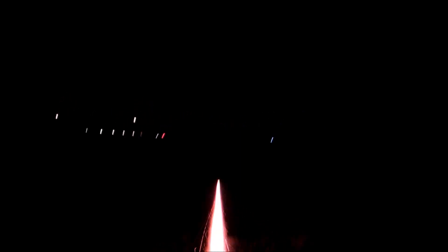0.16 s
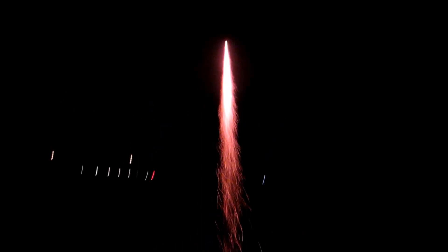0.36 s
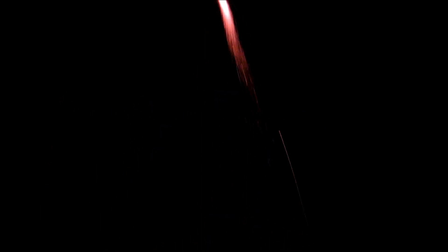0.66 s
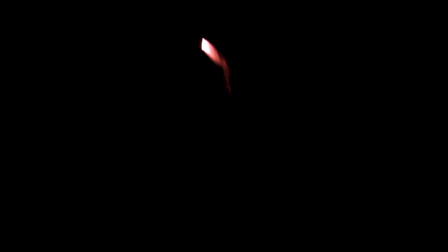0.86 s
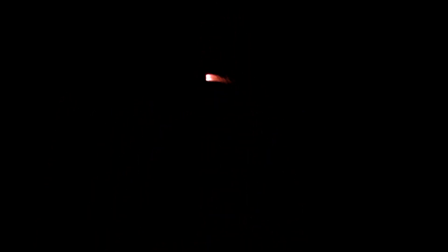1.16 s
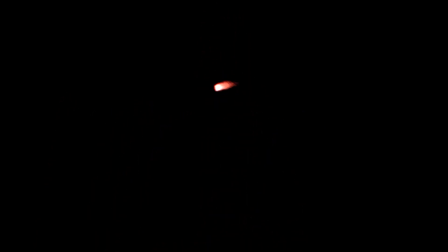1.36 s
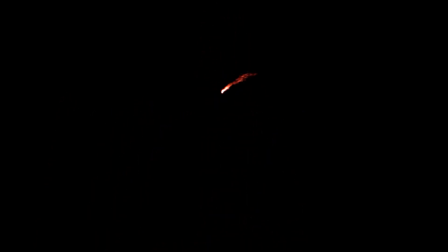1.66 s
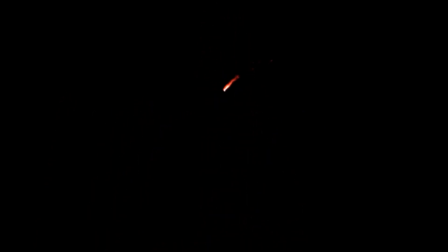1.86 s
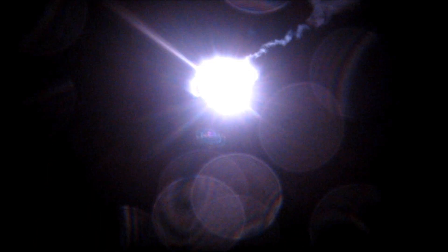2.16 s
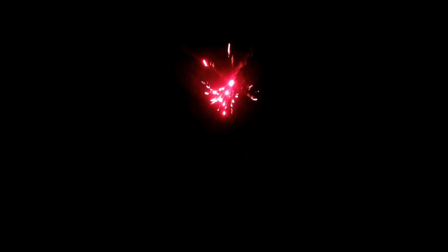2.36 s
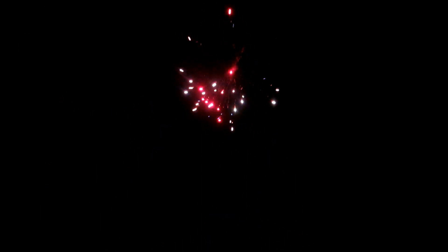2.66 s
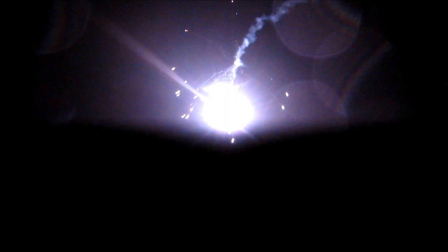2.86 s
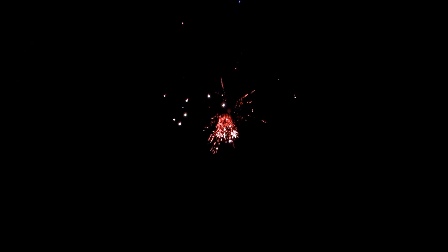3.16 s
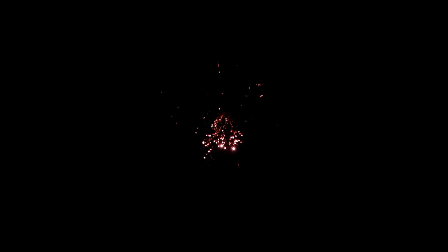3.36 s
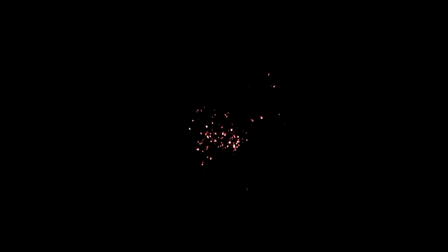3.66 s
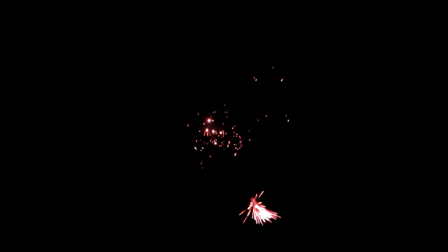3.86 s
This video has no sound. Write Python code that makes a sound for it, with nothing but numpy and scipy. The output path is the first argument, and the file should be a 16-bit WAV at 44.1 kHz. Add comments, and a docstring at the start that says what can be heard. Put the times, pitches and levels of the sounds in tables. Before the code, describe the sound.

Outdoors at night, a firework rocket takes off close by, hissing hard and dying away with height. After low wind thumps on the microphone, it bursts in two sharp cracks that overload the microphone and echo around the area.

```python
"""Firework rocket at night

A rocket leaves the ground with a hiss of turbulent exhaust that fades as it climbs and flares once more.
A gust buffets the microphone. Two bangs overhead, each a shock wave with a ground echo, overload the
recorder, which mutes for a moment and then lets the rolling echoes of the neighbourhood through."""
import sys
import numpy as np
from scipy import signal
from scipy.fft import rfft, irfft
from scipy.io import wavfile
from scipy.ndimage import uniform_filter1d, minimum_filter1d

SR = 44100
rng = np.random.default_rng(int(sys.argv[2]) if len(sys.argv) > 2 else 0)


def file_out(sig):
    """Save sig as 16-bit WAV at sys.argv[1]."""
    # one column per channel
    cols = np.atleast_2d(sig).T
    # limit, then scale
    lim = np.clip(cols, -1, 1)
    pcm = np.round(lim * 32767).astype(np.int16)
    wavfile.write(sys.argv[1], SR, pcm)


N = 176400
HOP, SIZE = 128, 512  # step and length of a short-time frame [samples]

# Shock arrivals, each bang followed by its ground echo:
# (time [s], push length [ms], edge [ms], push level [dB], rebound level [dB])
SHOCKS = [(2.40501, .11, .015, 44, 46), (2.40516, .04, .012, 49, 20), (2.41588, .26, .05, 43, 32),
          (2.42505, .2, .025, 20, -20), (3.10495, .1, .02, 44, 44.5), (3.11516, .24, .05, 43, 29.5)]


def gain_of(db):
    """Amplitude ratio of a level in decibels."""
    return 10 ** (np.asarray(db) / 20)


def unit_rms(x):
    """Normalisation to unit mean power."""
    return x / np.sqrt(np.mean(x ** 2) + 1e-20)


def curve_at(points, hz):
    """Interpolation of (frequency [Hz], value) points on a logarithmic frequency axis."""
    f, value = np.transpose(points)
    return np.interp(np.log(hz + 1), np.log(f + 1), value)


def unit_band(colour_db, hz, low_hz, high_hz):
    """Band normalisation: shifts a spectrum so that the given band has 0 dB rms."""
    inside = (hz > low_hz) & (hz < high_hz)
    return colour_db - 10 * np.log10((gain_of(2 * colour_db) * inside).mean(0))


def grid():
    """Frequencies (column) and frame times (row) of the short-time spectra."""
    return np.fft.rfftfreq(SIZE, 1 / SR)[:, None], np.arange(N // HOP + 5) * HOP / SR


def shaped_noise(field_db, patch_db, flicker_db):
    """Spectral shaping: noise follows a time-frequency field, with random patches and broadband flicker."""
    real, imag, patches = rng.standard_normal((N // HOP + 5, SIZE // 2 + 1, 3)).T
    flicker = unit_rms(uniform_filter1d(patches.mean(0), size=3))
    patches = unit_rms(uniform_filter1d(uniform_filter1d(patches, size=6, axis=0), size=16, axis=1))
    white = real + 1j * imag
    white_rms = np.std(signal.istft(white, nperseg=SIZE, noverlap=SIZE - HOP)[1])
    spectra = white * gain_of(field_db + patch_db * patches + flicker_db * flicker)
    return signal.istft(spectra, nperseg=SIZE, noverlap=SIZE - HOP)[1][:N] / white_rms


def night():
    """Ambient noise floor: a distant broadband hum and a faint whine of narrowband noise."""
    # Spectrum of the hum: (frequency [Hz], level [dB])
    hum_colour = [(350, -33), (600, -4), (911, -1.5), (1160, -1.5), (2130, -10.5), (2470, -8.5),
                  (4120, -13), (5250, -17), (8070, -29), (15000, -38)]
    hum_db, whine_db, whine_hz, width_hz = -51, -76, 7881, 6
    hz, _ = grid()
    colour = unit_band(curve_at([(60, -16)] + hum_colour[1:], hz), hz, 600, 15000)
    hum = shaped_noise(colour + hum_db, patch_db=0.95, flicker_db=0.34)
    pole = np.exp(-np.pi * width_hz / SR)
    drift = signal.lfilter([1], [1, -pole], rng.standard_normal(N) + 1j * rng.standard_normal(N))
    whine = unit_rms((drift * np.exp(2j * np.pi * whine_hz * np.arange(N) / SR)).real)
    return hum + gain_of(whine_db) * whine


def wind():
    """Turbulent pressure on the microphone: a deep, lumpy rumble throughout and the flutter of one gust."""
    # Envelopes, the rumble in consecutive stretches: (time [s], level [dB])
    rumble_levels = [
        [(0.0, -43.5), (0.116, -40), (0.166, -52), (0.374, -39), (0.484, -57.5), (1.076, -40), (1.2, -35)],
        [(1.22, -32), (1.238, -41), (1.426, -32), (1.448, -25), (2.12, -36), (2.204, -40.5), (2.36, -42)],
        [(2.48, -55), (2.492, -53), (2.794, -46), (2.812, -57), (2.898, -44), (2.93, -49), (3.07, -48)],
        [(3.18, -49), (3.38, -59), (3.416, -49), (3.444, -67), (3.704, -38), (3.77, -49), (4.0, -41.5)],
    ]
    gust_levels = [(0.8, -54), (0.82, -43.5), (0.972, -78), (0.994, -49.5), (1.55, -23.5), (1.86, -36.5),
                   (1.938, -64), (1.964, -31.5), (2.05, -48), (2.164, -42), (2.206, -63), (2.264, -38.5),
                   (2.332, -67), (2.36, -45)]
    # Spectra: (frequency [Hz], level [dB])
    rumble_colour = [(15, -25.5), (30, -5), (75, -1.5), (120, -4.5), (200, -13.5), (300, -27), (600, -70)]
    gust_colour = [(60, -28), (130, 2), (220, 0.5), (380, -9), (600, -21.5), (1200, -48.5)]
    lump_db, lump_hz = 4, 30  # depth and bandwidth of the random swings in level
    layers = [(rumble_colour, np.concatenate(rumble_levels)),
              (gust_colour, [(0.0035, -90.5)] + gust_levels + [(2.45, -90)])]
    hz, t, out = np.fft.rfftfreq(N, 1 / SR), np.arange(N) / SR, np.zeros(N)
    for colour, levels in layers:
        carrier, modulator = rfft(rng.standard_normal((2, N)))
        air = irfft(carrier * gain_of(curve_at(colour + [(20000, -260)], hz)), N)
        swings = unit_rms(irfft(modulator * np.exp(-(hz / lump_hz) ** 2), N))
        envelope = gain_of(np.interp(t, *np.transpose(levels)))
        out += envelope * unit_rms(air * gain_of(lump_db * swings))
    return out


def buffets():
    """Pressure pulses of the strongest eddies: brief dull puffs, the stronger ones wider in bandwidth."""
    # Eddies striking the microphone: (time [s], relative level [dB])
    eddies = [(0.989, -48), (1.02, -50), (1.061, -41), (1.148, -31), (1.254, -31.5), (1.287, -48),
              (1.305, -31.5), (1.337, -28), (1.391, -47), (1.391, -19.5), (1.434, -23.5), (1.47, -21),
              (1.516, -27), (1.534, -25.5), (1.572, -26.5), (1.571, -35), (1.602, -22), (1.657, -29.5),
              (1.685, -25), (1.778, -27.5), (1.839, -27), (1.923, -38), (1.965, -27), (1.994, -39),
              (2.022, -43), (2.207, -52.5)]
    rise_ms, low_hz, trim_db, length = 4, 215, -2, 1500
    age = np.arange(length) * 1000 / SR / rise_ms
    envelope = (age * np.exp(1 - age)) ** 2
    out = np.zeros(N)
    for start, db in eddies:
        top_hz = max(601 * gain_of(0.2 * (db + 22.5)), 2 * low_hz)
        band = signal.butter(3, [low_hz, top_hz], "band", fs=SR, output="sos")
        puff = envelope * signal.sosfilt(band, rng.standard_normal(2 * length))[length:]
        puff /= np.sqrt(np.sum(puff ** 2) / np.sum(envelope ** 2))
        out[round(start * SR):][:length] += gain_of(db + trim_db) * puff
    return out


def jet():
    """Jet noise: the turbulent exhaust hisses, changing colour as the rocket climbs away."""
    # Envelope of the hiss in consecutive stretches: (time [s], level [dB])
    hiss_levels = [
        [(0.0, -16), (0.19, -14.5), (0.208, -11.5), (0.402, -10), (0.6, -15.5)],
        [(0.62, -15), (0.896, -19.5), (0.934, -24), (1.166, -23.5), (1.2, -26)],
        [(1.22, -28), (1.314, -42.5), (1.514, -56.5), (1.726, -38.5), (1.766, -40.5), (1.836, -58),
         (2.04, -67.5), (2.05, -72), (2.1, -73)],
    ]
    # Spectra at five stages of the flight: (frequency [Hz], level [dB])
    on_pad = [(880, -45), (1500, -15), (1620, -13), (1930, -14), (2670, -7.5), (2890, -10), (3250, -7),
              (4850, -1), (5340, -3), (5610, -0.5), (6690, -5), (11600, -5.5), (13800, -12.5),
              (15500, -21.5)]
    lift_off = [(76, -44), (130, -15), (477, -10), (607, -9), (670, -10.5), (1320, -7.5), (1430, -4),
                (1680, -7.5), (3320, -1), (10600, 0), (12700, -1.5), (15500, -17)]
    climbing = [(350, -54), (600, -21), (669, -21.5), (890, -15.5), (1140, -16.5), (1230, -13),
                (1490, -13.5), (1730, -9), (4430, 0), (6580, -9.5), (7430, -4), (10000, -1.5), (12800, -9),
                (15500, -21.5)]
    aloft = [(530, -41), (900, -11.5), (1180, -9), (1540, -5.5), (1710, -4.5), (1860, -4.5), (2630, -1.5),
             (3420, -2.5), (4130, 0), (6900, -10), (7860, -5.5), (10200, -3.5), (13300, -13.5),
             (15500, -27)]
    flare = [(650, -23), (1100, -3.5), (1140, -9), (1560, -5.5), (2470, -8), (2850, -11), (3950, -8.5),
             (6830, -14), (10100, -16.5), (15000, -38)]
    # Moments when the colour leaves one stage or reaches the next: (time [s])
    stage_times = [.15, .22, .42, .6, .8, 1.0, 1.25, 1.5]
    ceiling = 0.78  # soft saturation of the preamplifier
    hz, t = grid()
    stage = np.interp(t, stage_times, [0, 1, 1, 2, 2, 3, 3, 4])
    colour = 0
    for k, points in enumerate((on_pad, lift_off, climbing, aloft, flare)):
        spectrum = curve_at([(100, -30)] + points[1:] + [(17000, -50)], hz)
        weight = np.maximum(1 - abs(stage - k), 0)
        colour += weight * unit_band(spectrum, hz, 2000, 14000)
    level = np.interp(t, *np.concatenate(hiss_levels).T, right=-120)
    hiss = shaped_noise(colour + level, patch_db=1.0, flicker_db=0.44)
    return ceiling * np.tanh(hiss / ceiling)


def rolling_echoes():
    """Diffuse reflection of each bang: body, lower treble and upper treble fade at their own pace."""
    # Body of the echoes, one list for each bang: (time [s], level [dB])
    body_levels = [
        [(2.428, -28), (2.488, -37), (2.536, -30), (2.576, -40.5), (2.662, -27), (2.67, -37.5), (2.74, -36),
         (2.812, -45), (2.82, -40), (2.836, -40.5), (2.984, -38), (3.004, -38.5), (3.066, -37.5), (3.08, -36)],
        [(3.128, -30.5), (3.198, -36), (3.226, -30), (3.288, -37.5), (3.318, -31), (3.554, -42), (3.638, -35),
         (3.644, -38), (3.786, -38), (3.792, -35), (3.86, -41.5), (3.888, -32), (3.906, -38), (4.0, -36.5)],
    ]
    # Their treble, likewise: (time [s], lower treble level [dB], upper treble level [dB])
    treble_levels = [
        [(2.434, -33, -38), (2.45, -35.5, -40.5), (2.59, -46, -54.5), (2.608, -37.5, -51), (2.67, -49, -56.5),
         (2.726, -44, -58.5), (2.824, -49.5, -63.5), (2.868, -44.5, -66), (2.884, -46.5, -63), (3.02, -46, -65),
         (3.08, -46.5, -63)],
        [(3.134, -33, -37.5), (3.22, -41.5, -48), (3.386, -46, -58), (3.396, -36.5, -59), (3.436, -49, -58),
         (3.476, -47.5, -62), (3.74, -45, -65), (3.752, -50, -67), (3.802, -43, -66), (3.832, -50, -71),
         (3.92, -48, -73.5), (3.986, -49, -74.5), (4.0, -52.5, -85)],
    ]
    # Their spectrum before each band takes its level: (frequency [Hz], level [dB])
    echo_colour = [(59, -37), (100, -2), (129, -12), (328, -8.5), (415, -4), (481, -2), (691, -3.5),
                   (1390, -11.5), (2630, -13.5), (10200, -30), (14100, -43), (16000, -63)]
    bands_hz = [(300, 1300), (2000, 5000), (7000, 12000)]
    settle_db, settle_ms = -24.5, 18
    hz, t = grid()
    colour = curve_at(echo_colour, hz)
    times, lower_db, upper_db = np.concatenate(treble_levels).T
    envelopes = [np.concatenate(body_levels).T, (times, lower_db), (times, upper_db)]
    band_index = curve_at([(900, 0), (3000, 1), (9000, 2)], hz)
    field = 0
    for k, (band, envelope) in enumerate(zip(bands_hz, envelopes)):
        weight = np.maximum(1 - abs(band_index - k), 0)
        field += weight * (unit_band(colour, hz, *band) + np.interp(t, *envelope))
    echoes = shaped_noise(field, patch_db=1, flicker_db=1)
    now = np.arange(N) / SR
    for bang in body_levels:  # the microphone drifts back after each overload
        since = now - bang[0][0]
        echoes -= gain_of(settle_db) * (since > 0) * np.exp(-abs(since) * 1000 / settle_ms)
    return echoes * (now > SHOCKS[0][0])


def shocks():
    """Shock waves: a short steep push, then an opposite rebound with a brief, faint rough noise after it."""
    rebound_ms, roughness_ms, roughness_db = 0.8, 7, -42  # roughness level relative to the rebound
    out, ms = np.zeros(N), np.arange(N) * 1000 / SR
    noise = unit_rms(signal.lfilter([1], [1, -0.6], rng.standard_normal(N)))
    for start, length_ms, edge_ms, push_db, rebound_db in SHOCKS:
        age_ms = np.clip(ms - start * 1000, -5, 40)
        front = 0.5 + 0.5 * np.tanh(age_ms / edge_ms)
        back = 0.5 + 0.5 * np.tanh((age_ms - length_ms) / edge_ms)
        tail_ms = np.maximum(age_ms - length_ms, 0)
        roughness = gain_of(roughness_db) * np.exp(-(tail_ms / roughness_ms) ** 3) * noise
        rebound = np.exp(-tail_ms / rebound_ms) + roughness
        out += gain_of(rebound_db) * back * rebound - gain_of(push_db) * (front - back)
    return out


def scene():
    """Linear superposition of all sources, the same in both channels."""
    return np.tile(jet() + shocks() + rolling_echoes() + wind() + buffets() + night(), (2, 1))


def record(dry):
    """Overload: a limiter mutes and holds briefly; hard clipping and a low-pass band limit follow."""
    trip_db, mute_db, hold_s, cutoff_hz = 36, -40, 0.0106, 15900
    below_trip = (abs(dry) < gain_of(trip_db)).astype(float)
    half_hold = round(hold_s * SR) // 2
    gate = minimum_filter1d(below_trip, size=2 * half_hold + 1, axis=1, origin=half_hold)
    gate = np.minimum(gate, signal.lfilter(np.ones(30) / 30, [1], gate, axis=1))  # reopens on a ramp
    limited = np.clip(dry * gain_of(mute_db * (1 - gate)), -1, 1)
    low_pass = signal.firwin(511, cutoff_hz, window=("kaiser", 9), fs=SR)[None]
    return np.clip(signal.oaconvolve(limited, low_pass, "same"), -1, 1)


dry = scene()
out = record(dry)
file_out(out)
```